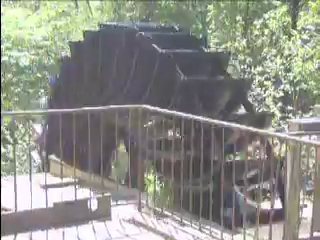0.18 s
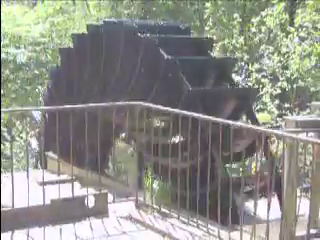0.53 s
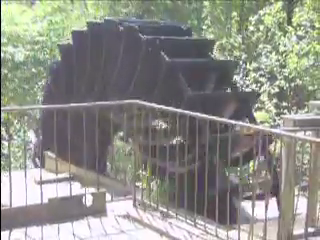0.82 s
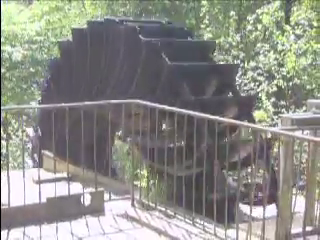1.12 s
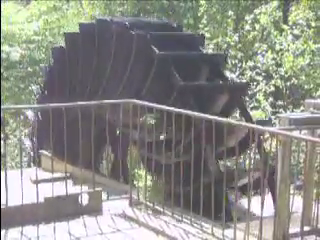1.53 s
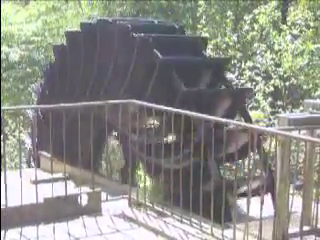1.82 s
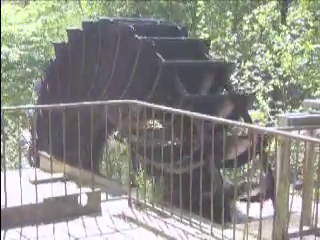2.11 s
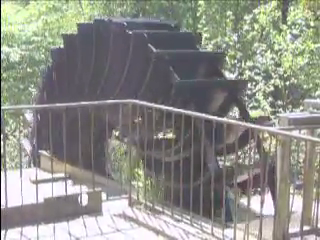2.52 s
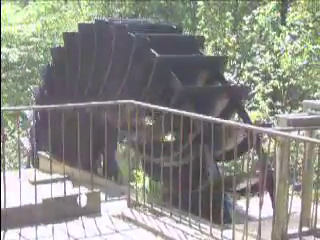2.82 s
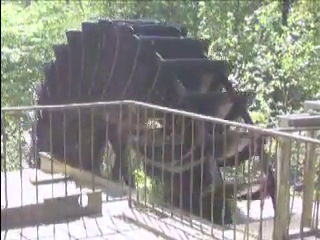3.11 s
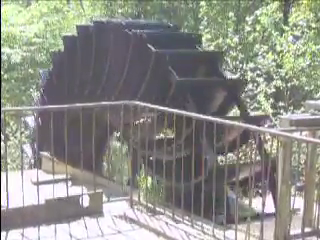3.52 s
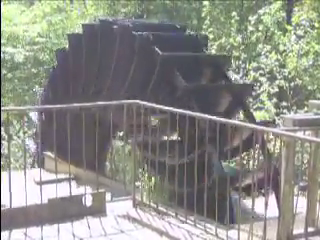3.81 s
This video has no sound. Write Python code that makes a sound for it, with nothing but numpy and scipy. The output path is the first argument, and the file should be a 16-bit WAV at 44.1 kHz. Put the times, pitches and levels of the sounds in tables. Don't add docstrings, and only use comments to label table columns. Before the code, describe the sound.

Water wheel turning in a stream, paddles slapping rhythmically over rushing water, gurgling buckets and low rumble

```python
import sys
import numpy as np
from scipy import signal
from scipy.fft import rfft, irfft, next_fast_len
from scipy.io import wavfile
from scipy.ndimage import uniform_filter1d

SR = 44100
rng = np.random.default_rng(int(sys.argv[2]) if len(sys.argv) > 2 else 0)


def to_wav(sig):
    pcm = np.clip(np.atleast_2d(sig), -1, 1) * 32767
    pcm = np.round(pcm).astype(np.int16)
    wavfile.write(sys.argv[1], SR, pcm.T)


def volts_from_decibels(level):
    exponent = np.asarray(level, float) / 20
    return 10 ** exponent


N = 175518

# pitch_hz, level_db (per Hz)
BUCKET_SPECTRUM = [(150, -4.5), (327, -3.5), (430, -5), (567, -1.5), (694, -4.5), (1070, -8), (1400, -20),
                   (3300, -86)]
# pitch_hz, level_db (per Hz)
RUSH_SPECTRUM = [(1300, -4.5), (1800, -2), (2460, 0), (2800, -3.5), (3600, -4.5), (5030, -6), (6550, -8.5),
                 (9820, -10.5)]
FLOW_SHARE = 0.46


def evened(x):
    return x / np.sqrt(np.mean(x ** 2) + 1e-20)


def slow_waver(samples):
    once = uniform_filter1d(rng.standard_normal(N), samples)
    return evened(uniform_filter1d(once, samples))


def read(points, hz):
    f, value = np.transpose(points)
    out = np.interp(np.log(hz + 1), np.log(f + 1), value)
    return out - 40 * np.maximum(np.log((f[0] + 1) / (hz + 1)), 0)


def colour(x, points):
    n = next_fast_len(len(x))
    gain = volts_from_decibels(read(points, np.fft.rfftfreq(n, 1 / SR)))
    return evened(irfft(rfft(x, n) * gain, n)[:len(x)])


def water(points, size, patchy_db, tall, long):
    frames = 4 * N // size + 5
    bins = size // 2 + 1
    a, b, patches = rng.standard_normal((frames, bins, 3)).T
    patches = uniform_filter1d(patches, int(tall), 0)
    patches = evened(uniform_filter1d(patches, int(long), 1))
    z = (a + 1j * b) * volts_from_decibels(patchy_db * patches)
    noise = signal.istft(z, nperseg=size, noverlap=3 * size // 4)[1][:N]
    return colour(noise, points)


def grains(per_s, lo_hz, hi_hz, cycles, spread_db, busy):
    size = volts_from_decibels(spread_db * np.minimum(rng.exponential(1, N), 4))
    size = size * (rng.random(N) < busy * per_s / SR)
    kind, out = rng.integers(0, 24, N), np.zeros(N)
    for k, hz in enumerate(np.geomspace(lo_hz, hi_hz, 24)):
        u = np.arange(0, 3 * cycles / hz, 1 / SR) * hz / cycles
        tone = np.sin(2 * np.pi * cycles * (u + 0.062 * u ** 2))
        out += signal.oaconvolve(size * (kind == k), u * np.exp(-3 * u) * tone)[:N]
    return out


def paddles():
    # start_s, spray_db, spill_db, dullness_db
    slap_times = [(.31, -2, -4, -10), (.575, 1, -5, 0.5), (0.822, 0.5, -7.5, 2.5), (1.08, 2.5, -4.5, 0.5),
                  (1.335, 1, -4, -4), (1.586, 2, -4, 1.5), (1.842, 3, -3, 0.5), (2.1, 3, -3, -0.5),
                  (2.352, 2, -4, -3), (2.609, 1.5, -4.5, -2), (2.861, 1, -3.5, -1.5), (3.12, -2.5, -5, -4),
                  (3.375, 0, -6, -0.5), (3.62, -1, -6, -5), (3.88, -0.5, -6.5, 3)]
    rise_s, fall_s = 0.019, 0.075
    spill_lead_s, spill_width_s = 0.084, 0.042
    t, bright, dull = np.arange(N) / SR, np.zeros(N), np.zeros(N)
    for s, spray_db, spill_db, dull_db in slap_times:
        rise = -((t - s) / rise_s) ** 2 / 2
        slap = np.exp(np.where(t < s, rise, (s - t) / fall_s))
        spill = volts_from_decibels(spill_db) * np.exp(-((t - s + spill_lead_s) / spill_width_s) ** 2 / 2)
        bright += volts_from_decibels(spray_db) * slap + spill
        dull += volts_from_decibels(spray_db + dull_db) * slap + spill
    return bright, dull


def spray(bright, dull):
    noise = water(RUSH_SPECTRUM, size=256, patchy_db=1.8, tall=6, long=15)
    low = signal.sosfilt(signal.butter(2, 3500, fs=SR, output="sos"), noise)
    return volts_from_decibels(-41) * (low * dull + (noise - low) * bright)


def fizz(bright):
    tones = grains(5000, 1380, 9940, cycles=4.8, spread_db=5.5, busy=0.36 + bright)
    return volts_from_decibels(-51.5) * colour(tones, RUSH_SPECTRUM)


def gulps():
    # start_s, pitch_hz, level_db, length_s
    pockets = [(.28, 79.6, -28.5, 0.086), (.62, 70, -38, 0.046), (.84, 77, -32, 0.064),
               (1.32, 87.6, -40, 0.034), (1.46, 45, -31, 0.035), (2.42, 69.7, -32, 0.049),
               (2.5, 517, -36, 0.079), (2.52, 55, -34, 0.048), (2.78, 293, -37, 0.07),
               (3.35, 254, -41, 0.033), (1.18, 198, -34, 0.04), (1.25, 69, -41, 0.044),
               (1.6, 74.5, -31, 0.052), (2.28, 348, -31, 0.031), (2.63, 65.3, -32, 0.044),
               (2.845, 589, -32.5, .04), (2.851, 468, -38, 0.026), (3.699, 372, -40, .05),
               (3.58, 567, -36.5, 0.059), (3.025, 94, -28.5, 0.091), (3.085, 269, -40, 0.021),
               (3.13, 459, -29.5, 0.042), (3.285, 558, -36, 0.068), (3.59, 98, -29, 0.05),
               (3.76, 69, -31, .06), (3.88, 336, -36, 0.058)]
    glide = 0.01
    out = np.zeros(N + SR)
    for s, hz, db, length in pockets:
        u = np.arange(0, length, 1 / SR) / length
        swell = np.sin(np.pi * (u / 2.02) ** 0.27) ** 2
        tone = np.sin(2 * np.pi * hz * length * (u + glide * (u ** 2 - u)))
        out[round(s * SR):][:len(u)] += volts_from_decibels(db + 3.5) * swell * tone
    return out[:N]


def bucket_flow():
    # start_s, level_db
    filling = [(.04, -45), (.3, -36.5), (.55, -39.5), (1.1, -38.5), (1.45, -41), (1.8, -39), (2.15, -39.5),
               (2.52, -36), (2.68, -40.5), (2.85, -36.5), (2.97, -37.5), (3.15, -38), (3.5, -38.5),
               (3.85, -38), (3.98, -45)]
    return np.interp(np.arange(N) / SR, *np.transpose(filling)) + 37


def buckets(dull, flow_db):
    churn = water(BUCKET_SPECTRUM, size=1024, patchy_db=1.0, tall=6, long=3.2)
    return volts_from_decibels(-37.5 + FLOW_SHARE * flow_db) * churn * (1 + 0.54 * dull)


def bubbles(dull, flow_db):
    tones = grains(400, 194.6, 1350, cycles=4.2, spread_db=3, busy=0.6 + dull)
    return volts_from_decibels(-44.5 + FLOW_SHARE * flow_db) * colour(tones, BUCKET_SPECTRUM)


def hollows(flow_db):
    # pitch_hz, width_hz, level_db
    resonances = [(298, 40, -47), (515, 30, -49), (562, 30, -45), (635, 35, -45)]
    pitch_wander = 0.03
    out = np.zeros(N)
    for hz, width, db in resonances:
        moving_hz = hz * (1 + pitch_wander * slow_waver(2500))
        turn = np.exp(2j * np.pi * np.cumsum(moving_hz) / SR)
        r = np.exp(-np.pi * width / SR)
        noise = rng.standard_normal(N) + 1j * rng.standard_normal(N)
        ring = signal.lfilter([1], [1, -2 * r, r * r], noise)
        out += volts_from_decibels(db) * evened((turn * ring).real)
    return out * volts_from_decibels(FLOW_SHARE * flow_db)


def rush():
    return volts_from_decibels(-42) * water(RUSH_SPECTRUM, size=256, patchy_db=0.55, tall=3.6, long=13)


def rumble(dull, flow_db):
    # pitch_hz, level_db (per Hz)
    low_spectrum = [(11, -42), (18, -8), (54, 0), (76, 0.5), (105, -1.5), (132, -5), (156, -13.5),
                    (170, -17), (220, -18), (370, -120)]
    roll = water(low_spectrum, size=2048, patchy_db=-1.0, tall=5.2, long=8.6)
    return volts_from_decibels(-36 + 0.15 * flow_db) * roll * (1 + 0.059 * dull)


def whine(t, gain_db):
    # pitch_hz, level_db
    tones = [(4942, -66), (9884, -70), (12166, -99)]
    hot_start = [9, 5, 9]
    settle_s, phase_wander = 0.26, 1
    out = np.zeros(N)
    for (hz, db), start_db in zip(tones, hot_start):
        waver = slow_waver(3000)
        level_db = db + 3.5 + 0.5 * gain_db + start_db * np.exp(-(t / settle_s) ** 4)
        tone = np.sin(2 * np.pi * hz * t + phase_wander * waver)
        out += volts_from_decibels(level_db) * tone * (1 + 0.14 * waver[::-1])
    return out


def microphone(x):
    # pitch_hz, level_db
    treble = [(9800, 0), (10500, -2), (11000, -5.5), (11500, -12.5), (12000, -24), (12400, -30)]
    hz = np.fft.rfftfreq(N, 1 / SR)
    dip_db = -4.5 * np.exp(-((hz - 424) / 20) ** 2)
    response_db = np.interp(hz, *np.transpose(treble)) + dip_db
    return irfft(rfft(x, axis=1) * volts_from_decibels(response_db), N, axis=1)


def switch_on_thump(since):
    slow_s, fast_s = 0.1, 0.031
    return 0.31 * np.exp(-since / slow_s) + 0.17 * np.exp(-(since / fast_s) ** 2)


def scene():
    bright, dull = paddles()
    flow_db = bucket_flow()
    splash = spray(bright, dull) + fizz(bright)
    gurgle = gulps() + buckets(dull, flow_db) + bubbles(dull, flow_db) + hollows(flow_db)
    return (splash + gurgle + rush() + rumble(dull, flow_db))[None]


def low_pass(x):
    return signal.sosfilt(signal.butter(12, 16910, fs=SR, output="sos"), x)


def record(dry):
    # start_s, level_db
    gain_climb = [(.036, -25), (.17, -19), (.2, -18), (.29, -14.5), (.32, -13), (.44, -10.5), (.47, -10),
                  (.54, -8), (.57, -6.5), (.68, -4.5), (.72, -2.5), (.95, -1), (1.2, -0.5), (2, -1.5),
                  (3, -0.96), (3.98, -0.4)]
    on_s = 0.03627
    t = np.arange(N) / SR
    gain_db = np.interp(t, *np.transpose(gain_climb))
    hiss = volts_from_decibels(-67) * colour(rng.standard_normal(N), [(100, -16), (12500, -10)])
    x = microphone(dry * volts_from_decibels(gain_db) + hiss) + whine(t, gain_db)
    below_edge = np.fft.rfftfreq(N, 1 / SR) < 12370
    x = irfft(rfft(x, axis=1) * below_edge, N, axis=1)
    x = (x + switch_on_thump(np.maximum(t - on_s, 0))) * (t >= on_s)
    x = signal.oaconvolve(x, signal.firwin(101, 16400, fs=SR)[None], "same")
    return low_pass(x)


dry = scene()
out = record(dry)
to_wav(out)
```